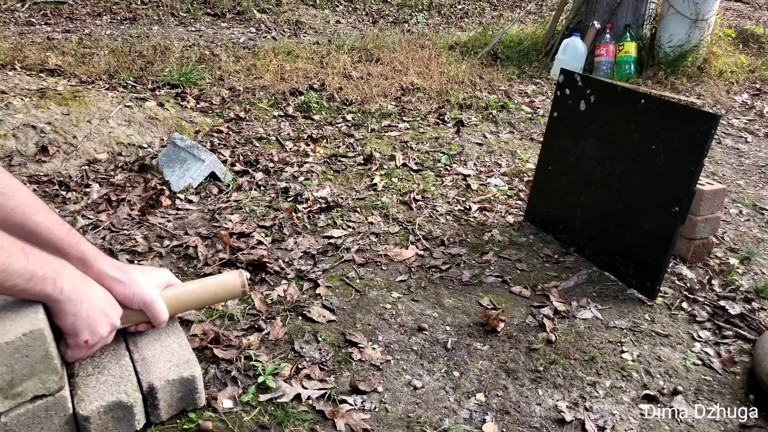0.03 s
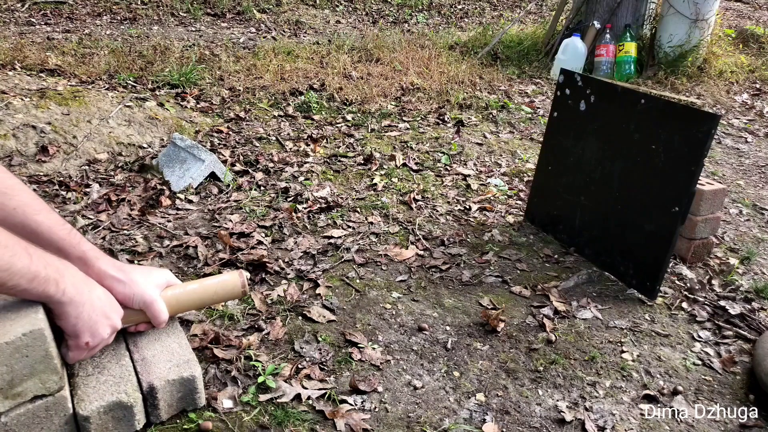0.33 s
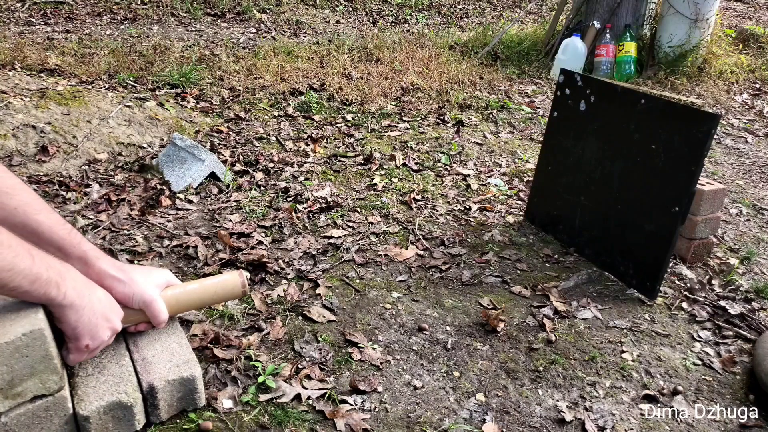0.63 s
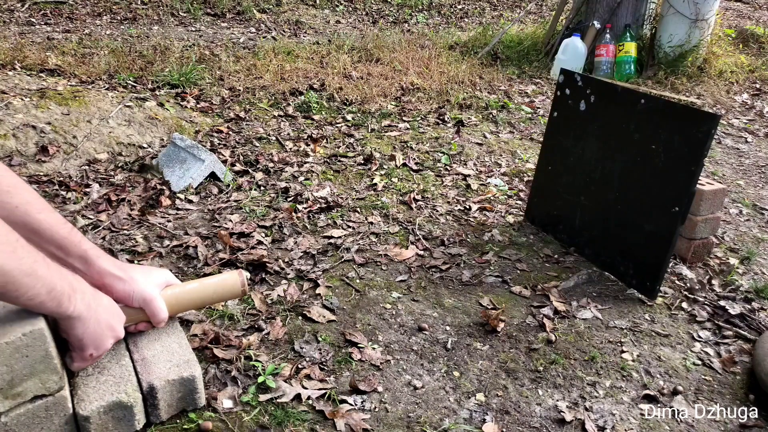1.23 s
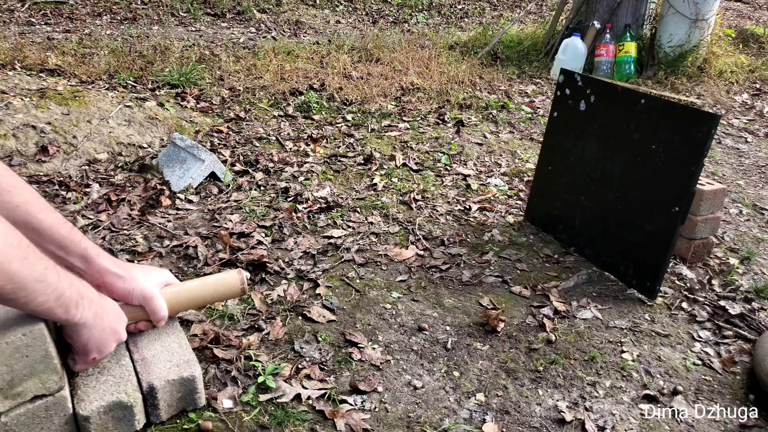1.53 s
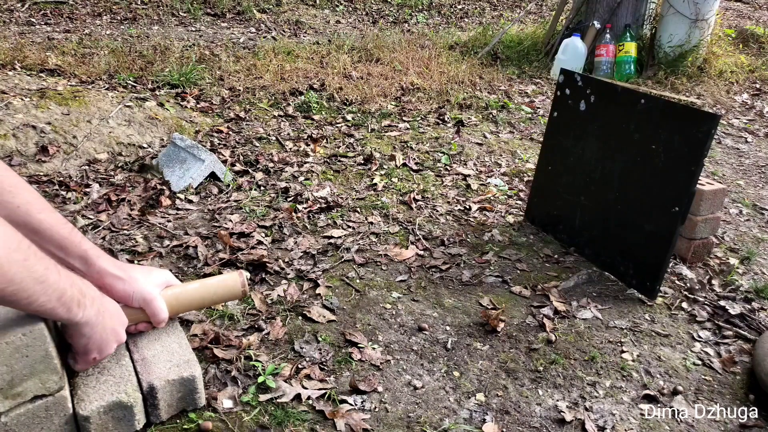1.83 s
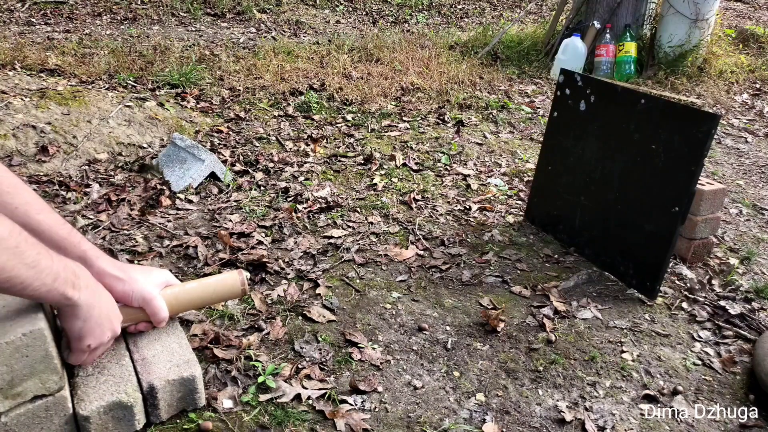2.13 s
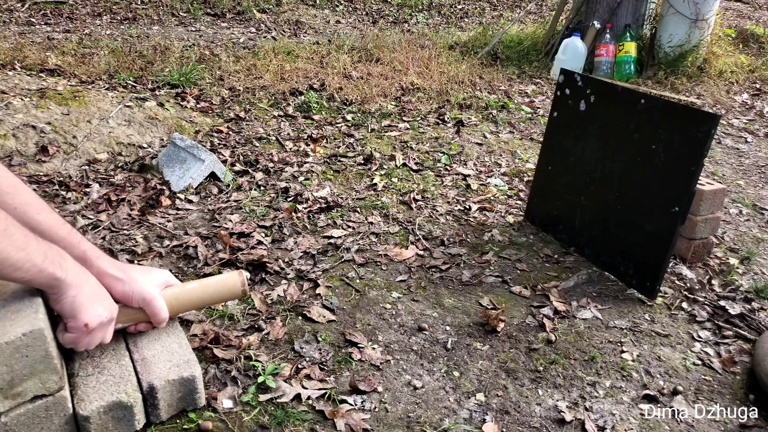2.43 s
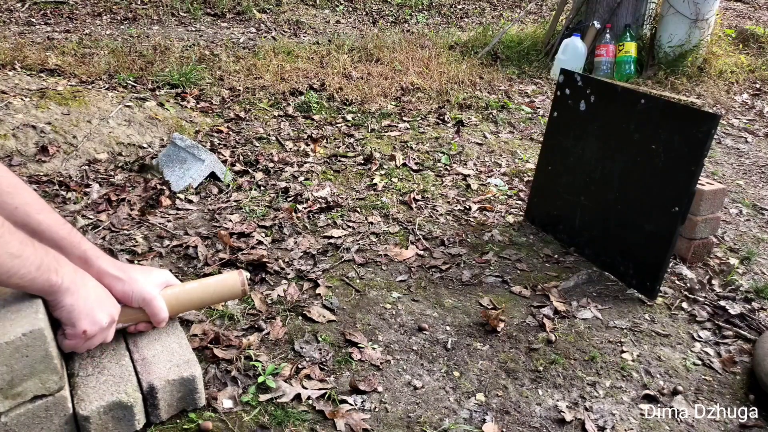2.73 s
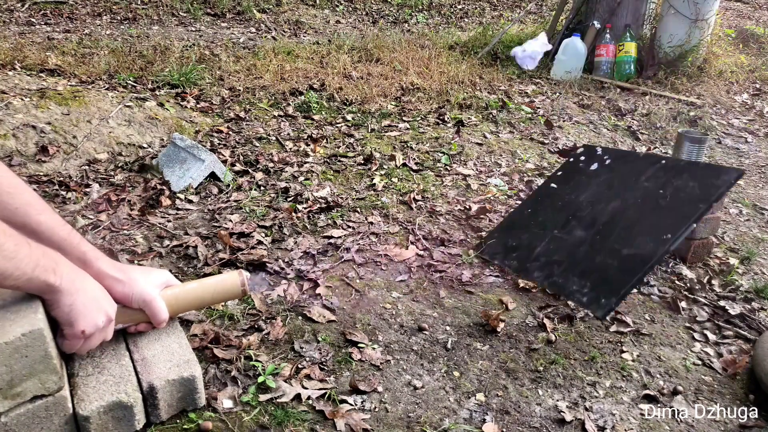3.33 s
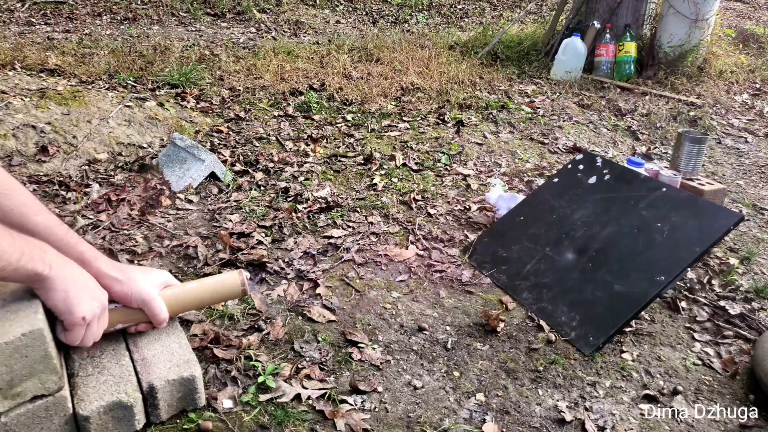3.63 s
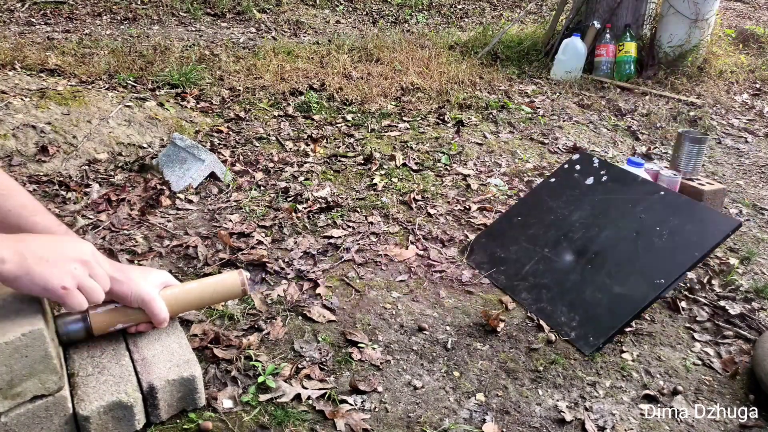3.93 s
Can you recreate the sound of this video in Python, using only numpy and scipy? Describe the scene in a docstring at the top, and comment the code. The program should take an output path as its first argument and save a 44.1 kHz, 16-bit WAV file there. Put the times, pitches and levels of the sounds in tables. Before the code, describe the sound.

A handheld tube cannon fires one loud, sharp bang in a quiet yard after faint hand rubbing close to the microphone. The shot cracks against a board and echoes off trees as the board thuds softly into dry leaves.

```python
"""Tube cannon in a leafy yard

A hand-held tube cannon, braced on concrete blocks, fires at a propped board. Hands scuff near the
microphone over a distant rumble and faint chirps. A pressure wave thumps out of the muzzle, the shot
cracks on the board and the trees echo the bang. The board topples into dry leaves while the
recorder's volume, turned down by the bang, stays low. Then the sound is faded out."""
import sys
import numpy as np
from scipy import signal
from scipy.fft import rfft, irfft
from scipy.io import wavfile
from scipy.ndimage import uniform_filter1d

SR = 44100
rng = np.random.default_rng(int(sys.argv[2]) if len(sys.argv) > 2 else 0)


def digitize_waveform(pressure):
    """Quantize a signal to 16-bit integers and store it at the path in sys.argv[1].

    Rows of a 2-D input are taken as channels; values are limited to [-1, 1].
    """
    field = np.atleast_2d(pressure).T
    bounded = np.clip(field, -1, 1)
    quanta = np.round(bounded * 32767).astype(np.int16)
    wavfile.write(sys.argv[1], SR, quanta)


N = 176400

# A "tone" table shapes a noise: only the gaps between its levels count, not the levels themselves.
# A "decay" is the time a sound takes to fall by 60 dB.
# slow swell of the rumble and the chirps (time [s], added level [dB])
YARD_SWELL = [(0, -2.5), (.3, -2), (.75, 1), (1.7, 1), (2.6, 0), (3.02, 1.5), (3.3, -5)]
# tone of the distant rumble (pitch [Hz], level [dB])
RUMBLE_TONE = [(20, -24), (35, -11.5), (58, 0), (82, 2), (115, -5), (170, -14.5), (270, -10), (370, -24),
               (600, -32.5), (1500, -52)]
# tone of the airy hiss (pitch [Hz], level [dB])
HISS_TONE = [(200, 8.5), (600, -1), (1100, 1), (2500, -1.5), (4000, -4), (7400, -1), (8200, -15),
             (11000, -18), (13500, -30), (15800, -17.5)]
# tone of air brushing a microphone (pitch [Hz], level [dB])
BREEZE_TONE = [(15, -2), (30, 0), (70, -2), (150, -14), (400, -32), (1500, -60)]
# the clearest chirps (time [s], pitch [Hz], level before the swell [dB])
CLEAR_CHIRPS = [(.79, 2215, -56.5), (.795, 1440, -59), (1.0, 1000, -56), (1.232, 2060, -57),
                (2.037, 423, -47), (2.256, 1646, -49)]

# hands slipping close to the microphone (time [s], rub level [dB], creak level [dB], decay [s])
HAND_SLIPS = [(.374, -56, -58, 0.12), (.568, -47, -56.5, 0.31), (.648, -49, -56.5, .2),
              (.714, -46.5, -47.5, 0.055), (.738, -46.5, -59, .1), (.947, -58, -55, .06),
              (1.16, -48.5, -71, 0.14), (1.264, -53, -50.5, .05), (1.331, -50, -58, 0.11),
              (1.373, -47.5, -54.5, 0.25), (1.419, -48.5, -47, 0.086), (1.615, -48.5, -56, 0.23),
              (1.873, -44, -51, 0.076), (1.909, -47.5, -60, 0.28)]
# tone of a rub (pitch [Hz], level [dB])
RUB_TONE = [(80, -10), (200, 6.5), (520, -1), (750, -11.5), (1300, -9.5), (2200, -15), (3200, -21),
            (7000, -21.5), (15000, -49)]
# tone of a creak (pitch [Hz], level [dB])
CREAK_TONE = [(1000, -12), (2200, 7.5), (3000, -4), (3900, 3.5), (4800, -16), (8500, -15), (9200, 5),
              (9900, -9), (10700, -8), (11400, 1), (13300, -21), (15600, -4.5)]
# ringing notes of a tiny metal tick (pitch [Hz], level [dB], decay [s])
TICK_NOTES = [(8500, -59, .12), (13300, -56, 0.15), (15400, -62, .1)]

# the board lands and settles (time [s], thud level [dB], thud decay [s], leaf level [dB])
BOARD_LANDINGS = [(3.39, -34, .08, -45), (3.469, -42, .3, -60), (3.539, -30.5, 0.17, -50),
                  (3.565, -23.5, 0.18, -54), (3.68, -41, 0.13, -51), (3.697, -33, 0.16, -50.5)]
# tone of a thud on soil (pitch [Hz], level [dB])
THUD_TONE = [(40, -26), (100, 0), (190, 3), (280, -11), (480, 3), (750, -6), (1400, -13), (2500, -22),
             (8000, -47)]
# tone of crunching leaves, also used for the tick's click (pitch [Hz], level [dB])
CRUNCH_TONE = [(500, -14), (2000, 4.5), (6000, -4), (9000, -2), (15800, -7)]
# ringing notes of the board (pitch [Hz], level relative to the hit [dB], decay [s])
BOARD_NOTES = [(97, -12, 0.25), (246, -11, 0.4), (453, -8.5, 0.56), (572, -10, .35), (669, -14, .45),
               (725, -12, 0.4), (932, -15.5, 0.41), (1007, -10, 0.36)]

# dull thumps thrown back by trunks and banks (time [s], width [s], level [dB])
ECHO_THUMPS = [(3.168, 0.0007, -13), (3.209, 0.0017, -14.5), (3.254, .0009, -21)]
# tone of the yard's near echo (pitch [Hz], level [dB])
YARD_TONE = [(30, -12.5), (80, 0.5), (220, -6), (400, -4), (530, 0), (720, 1), (1050, 0.5), (1500, -0.5),
             (2800, -1), (4500, -4), (6600, -6.5), (8000, -11.5), (15800, -16.5)]
# how long the yard's echo lasts (pitch [Hz], decay [s])
YARD_DECAY = [(80, 0.71), (250, 0.44), (600, 0.91), (1500, .62), (3000, 0.53), (6500, 0.54), (9000, .46),
              (15000, .42)]
# tone of the later, duller echo from the woods (pitch [Hz], level [dB])
WOODS_TONE = [(40, -20), (100, -8), (170, -12.5), (270, -1), (500, -0.5), (1000, -5), (2000, -11),
              (4500, -14), (7000, -24.5), (9000, -30), (15800, -44)]
# how long the woods' echo lasts (pitch [Hz], decay [s])
WOODS_DECAY = [(100, 2.74), (400, 2.14), (1000, 1.48), (4000, 1.34), (12000, 1.07)]

# cracks of the shot on the board (time [s], level [dB], decay [s])
SHOT_CRACKS = [(3.1042, 9.5, .009), (3.114, 3, .015), (3.1168, 5.5, .04)]
# tone of a crack (pitch [Hz], level [dB])
CRACK_TONE = [(100, -11), (300, -5.5), (800, -0.5), (1700, 0.5), (3300, -2.5), (6200, -6.5), (8000, -15.5),
              (15800, -20.5)]
# ringing notes of the tube (pitch [Hz], level [dB], decay [s])
TUBE_NOTES = [(89, -4, 0.075), (187, 5, .04), (328, -2, .04), (494, 4, .04)]
# tone of gas rushing from the muzzle (pitch [Hz], level [dB])
JET_TONE = [(100, -8), (600, 0), (950, -8), (1600, -2), (3000, -10), (5800, -10), (7800, -16.5),
            (13000, -20.5), (15800, -14)]

# how much later a sound reaches the left microphone than the right; below zero, the left comes first
HAND_LAG_S, BOARD_LAG_S, MUZZLE_LAG_S = -.000252, .00016, -.00014
TICK_S, FIRE_S, SLAP_S = 2.352, 3.0886, 3.114
TIME = np.arange(N) / SR
SIDES = np.array([[1], [-1]])  # left, right


def gain(db):
    """Turn decibels into a number to multiply by."""
    return 10 ** (np.asarray(db) / 20)


def at_pitch(table, hz):
    """Look up a table between its rows, with every octave equally wide."""
    pitches, values = np.array(table, float).T
    return np.interp(np.log(hz + 1e-3), np.log(pitches), values)


def noise(tone, lag_s=0, direct=0):
    """Stereo noise of strength 1: the direct share comes from one direction, the rest from all around."""
    hz = np.arange(N // 2 + 1) * SR / N
    mid, side, beam = rfft(rng.standard_normal((3, N)))
    alike = .95 / (1 + (hz / 700) ** 3)  # both microphones hear nearly the same bass
    around = (mid * np.sqrt(1 + alike) + SIDES * side * np.sqrt(1 - alike)) / np.sqrt(2)
    aimed = beam * np.exp(-1j * np.pi * hz * lag_s * SIDES)
    spectrum = np.sqrt(1 - direct) * around + np.sqrt(direct) * aimed
    sound = irfft(spectrum * gain(at_pitch(tone, hz)), N)
    return sound / sound.std()


def envelope(start_s, rise_s, decay_s, hold_s=0):
    """Loudness that rises, holds and dies away."""
    age = TIME - start_s
    dying = np.exp(-np.log(1000) * np.maximum(age - rise_s - hold_s, 0) / decay_s)
    return np.clip(age / rise_s, 0, 1) * dying


def wobble(rate_hz):
    """A smooth random wobble with a typical size of 1."""
    size = max(int(SR / rate_hz), 2)
    smooth = uniform_filter1d(uniform_filter1d(rng.standard_normal(N), size), size)
    return smooth / smooth.std()


def since(start_s, lag_s):
    """Seconds since a sound reached the left and the right microphone."""
    return TIME - start_s - SIDES * lag_s / 2


def pressure_wave(start_s, width_s, lag_s):
    """One push of air and then one pull, with a peak of 1."""
    u = since(start_s, lag_s) / width_s
    return -u * np.exp((1 - u ** 2) / 2)


def ring(notes, start_s, lag_s):
    """A struck object sounds all its notes at once, and each dies away."""
    age = np.maximum(since(start_s, lag_s), 0)
    return sum(gain(db) * np.sin(2 * np.pi * hz * age) * np.exp(-np.log(1000) * age / decay)
               for hz, db, decay in notes)


def echo_tail(sound, decays, start_s, rise_s):
    """Split a noise into 12 pitch bands and let each die away at its own rate."""
    centres = np.geomspace(50, 16000, 12)
    spectrum, log_hz = rfft(sound), np.log(np.arange(N // 2 + 1) * SR / N + 1)
    tail = 0
    for hz, weights in zip(centres, np.eye(12)):
        band = irfft(spectrum * np.interp(log_hz, np.log(centres), weights), N)
        tail += band * envelope(start_s, rise_s, at_pitch(decays, hz))
    return tail


def swell_db():
    """The slow rise and fall of the background."""
    return np.interp(TIME, *np.array(YARD_SWELL).T)


def outdoors():
    """A far rumble wavers under a smooth hiss; a light breeze brushes each microphone on its own."""
    rumble = gain(-45.5 + swell_db() + .5 * wobble(12)) * noise(RUMBLE_TONE)
    hiss = gain(-55.5 + .5 * wobble(5.4)) * noise(HISS_TONE)
    breeze = np.array([noise(BREEZE_TONE)[0], noise(BREEZE_TONE)[1]])
    return rumble + hiss + gain(-56) * breeze


def chirps():
    """Short, soft, wavering notes come from all around: a few clear ones and many faint ones."""
    per_second, low_hz, high_hz, width_s = 60, 550.5, 3000, .0087
    faint = [(when * N / SR, low_hz * (high_hz / low_hz) ** height, -67 - 1.5 * np.log(max(luck, .05)))
             for when, height, luck in rng.random((int(per_second * N / SR), 3))]
    wavering_time = np.cumsum(1 + .1 * wobble(500)) / SR  # an uneven clock bends the pitch
    sound = np.zeros((2, N))
    for peak_s, hz, db in list(CLEAR_CHIRPS) + faint:
        span = slice(*np.searchsorted(TIME, [peak_s - 4 * width_s, peak_s + 4 * width_s]))
        lag = rng.uniform(-.97, 1) * HAND_LAG_S * SIDES  # a random direction
        shape = np.exp(-((TIME[span] - peak_s) / width_s) ** 2 / 2)
        note = np.sqrt(2) * np.sin(2 * np.pi * hz * (wavering_time[span] + lag))
        sound[:, span] += gain(db) * shape * note
    return sound * gain(swell_db())


def hands():
    """Handling noise: hands rub and creak close to the microphone in small, grainy slips."""
    grain = gain(3 * wobble(270))
    rub = grain * noise(RUB_TONE, HAND_LAG_S, direct=.32)
    creak = grain * noise(CREAK_TONE, HAND_LAG_S, direct=.54)
    sound = 0
    for start, rub_db, creak_db, decay in HAND_SLIPS:
        sound += gain(rub_db) * rub * envelope(start, rise_s=.009, decay_s=decay)
        sound += gain(creak_db) * creak * envelope(start, rise_s=.0027, decay_s=decay)
    return sound


def metal_tick():
    """Something metal clicks once and rings briefly."""
    click = gain(-55) * noise(CRUNCH_TONE) * envelope(TICK_S, rise_s=.0005, decay_s=.025)
    return click + ring(TICK_NOTES, TICK_S, HAND_LAG_S)


def falling_board():
    """The board thuds down, knocks its edge on the soil, rings a little and crushes dry leaves."""
    soil = noise(THUD_TONE, BOARD_LAG_S, direct=.76)
    leaves = noise(CRUNCH_TONE) * gain(4 * wobble(600))
    sound = 0
    for start, thud_db, decay, leaf_db in BOARD_LANDINGS:
        thud = soil * envelope(start, rise_s=.0064, decay_s=decay)
        knock = pressure_wave(start + .0059, width_s=.0012, lag_s=BOARD_LAG_S)
        sound += gain(thud_db) * (thud + knock + ring(BOARD_NOTES, start, BOARD_LAG_S))
        sound += gain(leaf_db) * leaves * envelope(start, rise_s=.0018, decay_s=.24)
    return sound


def echoes():
    """Ground and trunks scatter the bang: a few thumps, a bright near echo and a long, dull far one."""
    thumps = sum(gain(db) * pressure_wave(start, width, BOARD_LAG_S) for start, width, db in ECHO_THUMPS)
    near = noise(YARD_TONE, BOARD_LAG_S, direct=.14) * gain(1.4 * wobble(400))
    far = noise(WOODS_TONE, BOARD_LAG_S, direct=.15) * gain(1.5 * wobble(60))
    yard = gain(-3) * echo_tail(near, YARD_DECAY, start_s=3.095, rise_s=.018)
    woods = gain(-19.5) * echo_tail(far, WOODS_DECAY, start_s=3.134, rise_s=.055)
    return thumps + yard + woods


def shot_on_board():
    """The shot hits in a quick run of cracks; the board's face slaps the air and the board rings."""
    bursts = sum(gain(db) * envelope(start, rise_s=.00023, decay_s=decay)
                 for start, db, decay in SHOT_CRACKS)
    cracks = bursts * noise(CRACK_TONE, BOARD_LAG_S, direct=.6)
    slap = -gain(12) * pressure_wave(SLAP_S, width_s=.00022, lag_s=BOARD_LAG_S)  # pull, then push
    return cracks + slap + gain(-8.5) * ring(BOARD_NOTES, SLAP_S, BOARD_LAG_S)


def cannon():
    """A pressure wave leaves the muzzle, the tube rings on the rebound and gas rushes out."""
    width_s = .00052
    first_push = pressure_wave(FIRE_S - .0021, width_s, MUZZLE_LAG_S)  # the charge starts to move
    thump = gain(12.5) * pressure_wave(FIRE_S, width_s, MUZZLE_LAG_S)
    tube = -ring(TUBE_NOTES, FIRE_S, MUZZLE_LAG_S)
    rush = envelope(FIRE_S - .0018, rise_s=.0011, decay_s=.028, hold_s=.0041)
    jet = gain(5) * rush * noise(JET_TONE, MUZZLE_LAG_S, direct=.65)
    return first_push + thump + tube + jet


def scene():
    """All the sounds of the yard add up in the air."""
    bang = cannon() + shot_on_board() + echoes()
    return bang + falling_board() + hands() + metal_tick() + outdoors() + chirps()


def record(dry):
    """The recorder turns itself down at the bang; then the sound is faded out."""
    threshold_db, recovery_db_per_s = -13, .5
    fade_start_s, fade_db_per_s = 3.8, 36
    bass_cut = signal.butter(2, 48, "highpass", fs=SR, output="sos")
    treble_cut = signal.ellip(10, .2, 80, 15900, fs=SR, output="sos")
    sound = signal.sosfilt(bass_cut, dry)
    power = uniform_filter1d(np.mean(sound ** 2, axis=0), int(.013 * SR))
    excess_db = np.maximum(10 * np.log10(np.maximum(power, 1e-12)) - threshold_db, 0)
    recovery_db = recovery_db_per_s * TIME
    turn_down_db = np.maximum.accumulate(excess_db + recovery_db) - recovery_db  # fast down, slow back
    fade_db = fade_db_per_s * np.maximum(TIME - fade_start_s, 0)
    return signal.sosfilt(treble_cut, sound * gain(-turn_down_db - fade_db))


dry = scene()
out = record(dry)
digitize_waveform(out)
```